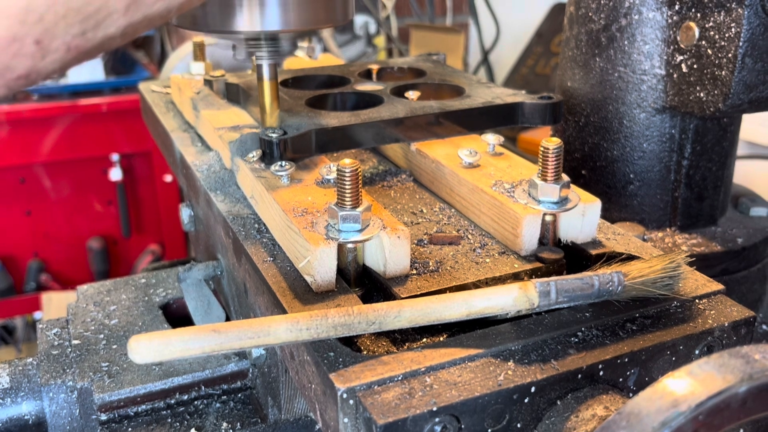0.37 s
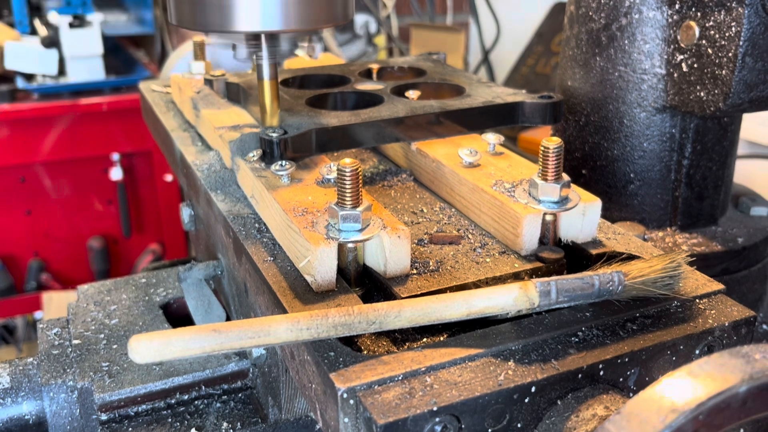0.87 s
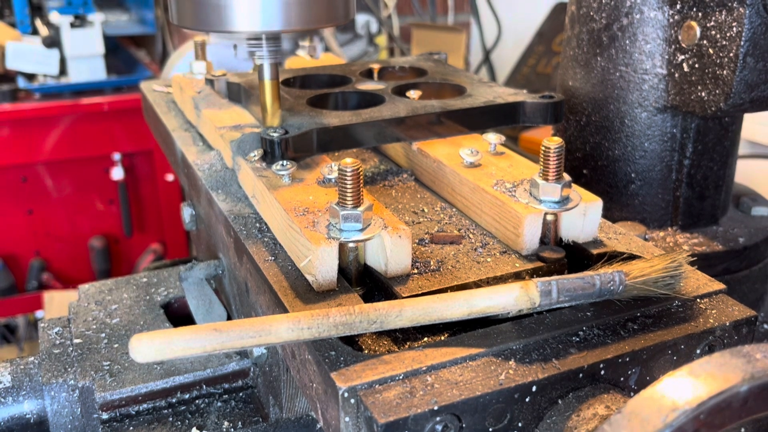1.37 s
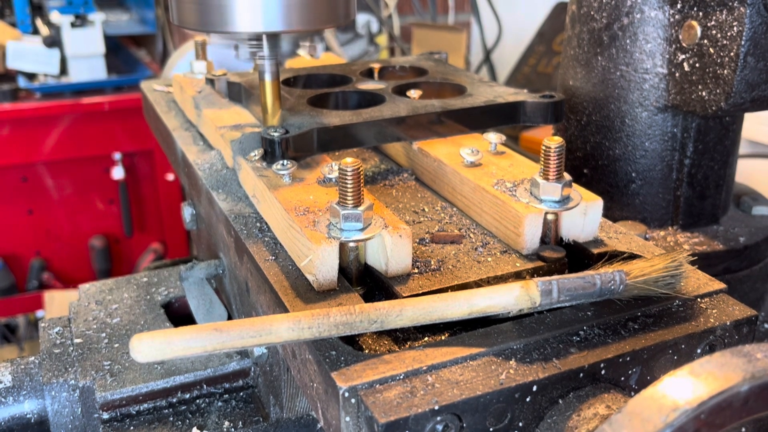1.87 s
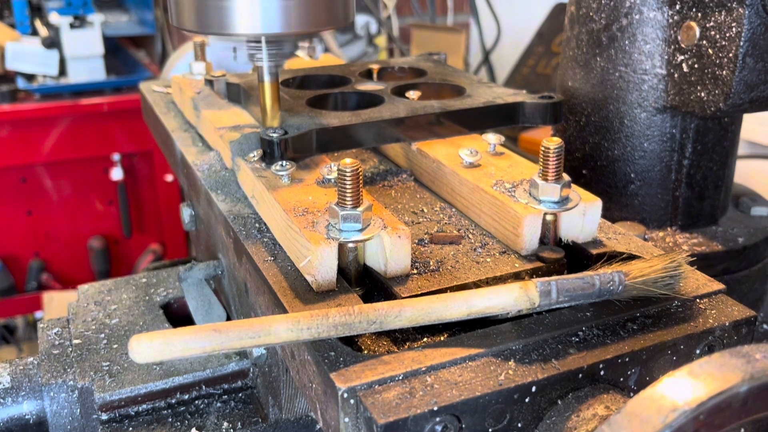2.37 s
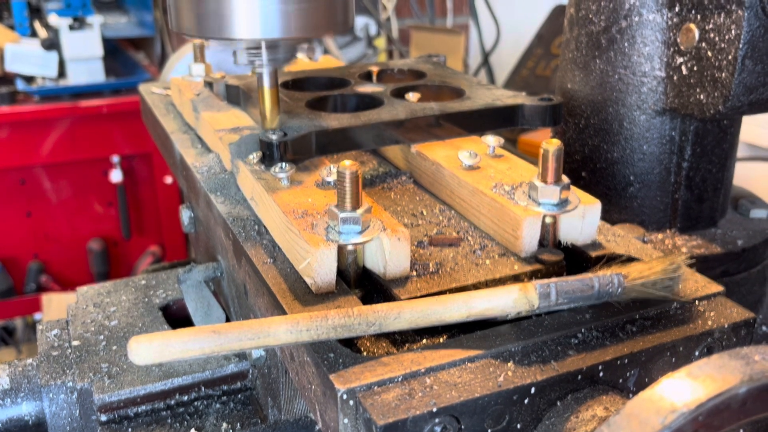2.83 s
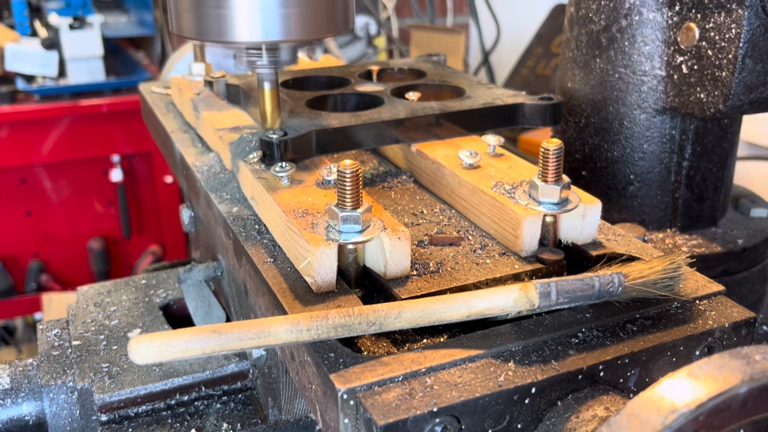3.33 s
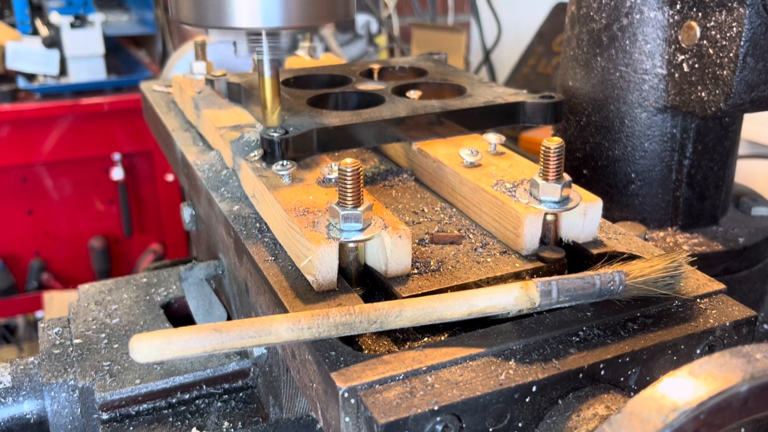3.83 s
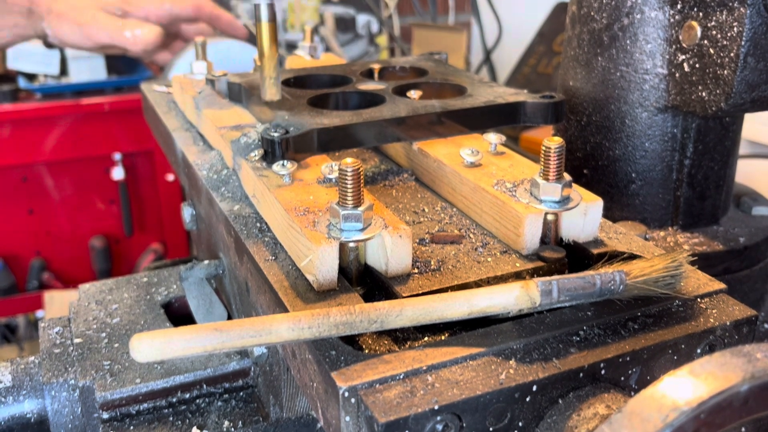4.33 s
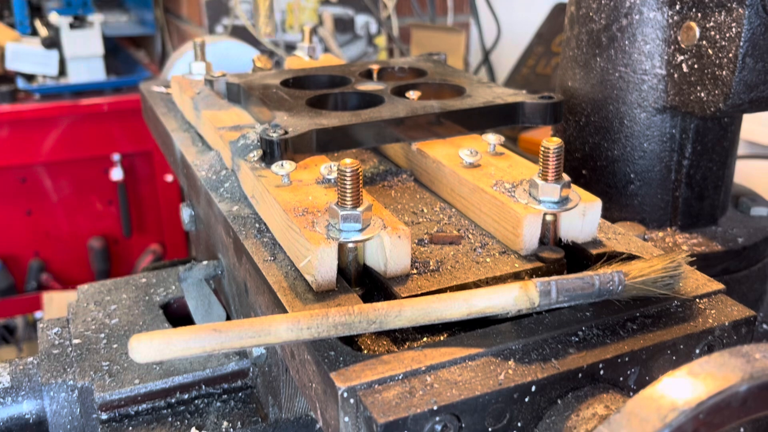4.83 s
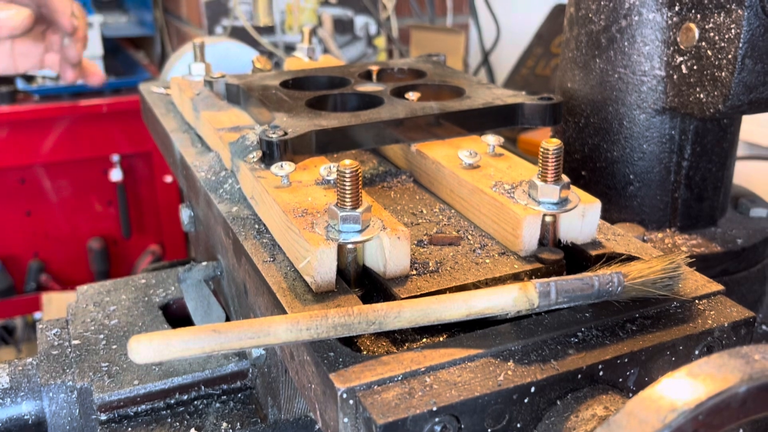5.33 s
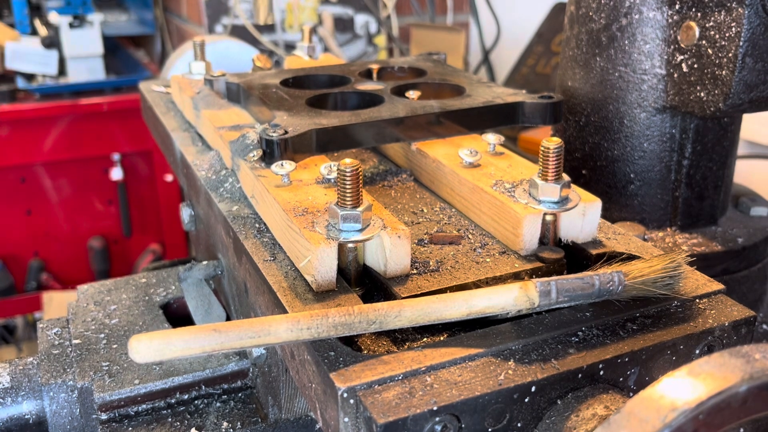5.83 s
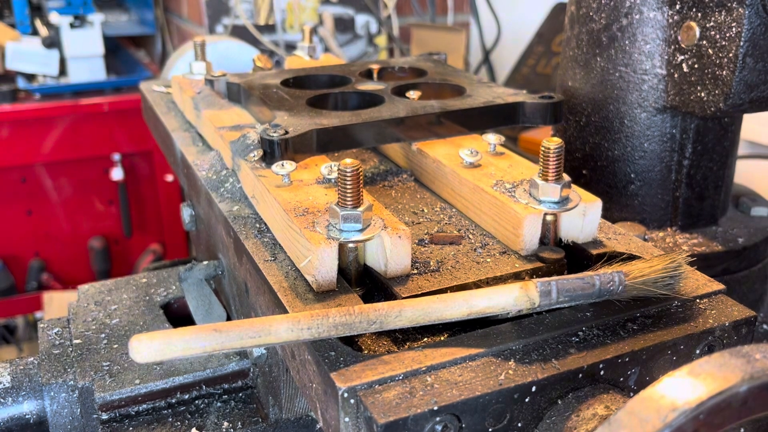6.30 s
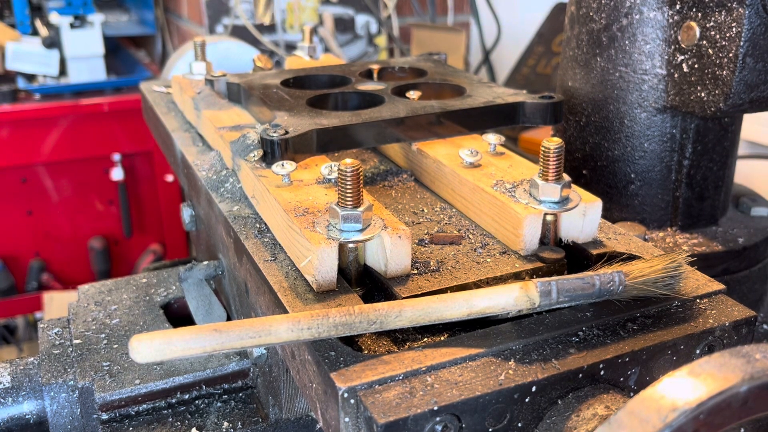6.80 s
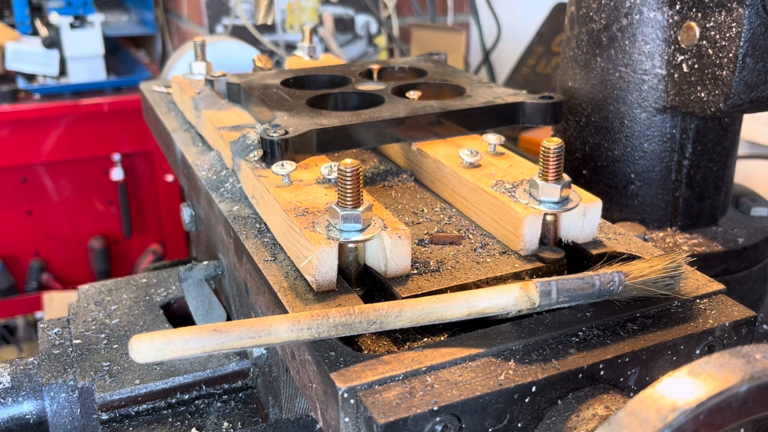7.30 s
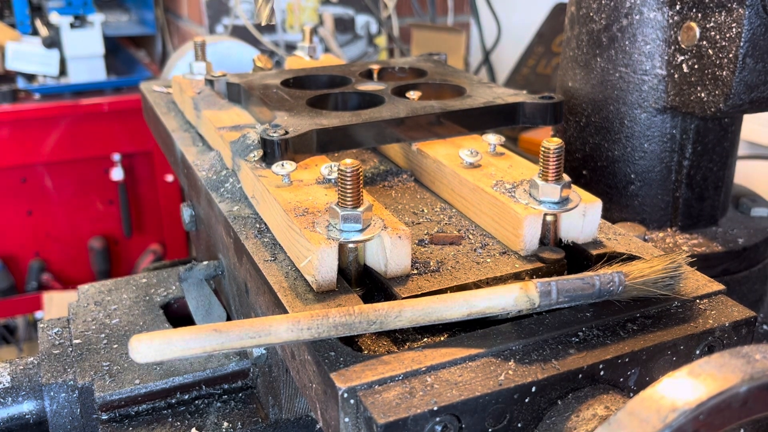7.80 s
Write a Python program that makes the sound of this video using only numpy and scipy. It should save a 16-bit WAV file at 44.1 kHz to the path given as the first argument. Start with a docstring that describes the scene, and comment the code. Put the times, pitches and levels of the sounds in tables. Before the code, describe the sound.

Steady drill press hum with rough cutting buzz and uneven belt thumps, a sharp switch click, a fading whir, then light knocks on a bench.

```python
"""First comes the hum of a belt-driven drill press in a small workshop, with belt thumps and a chattering end mill.
The motor hums at twice the mains frequency, the belt thumps the cast frame, and the end mill cuts plastic
and is lifted out. The switch clicks off, the spindle coasts to rest, and small things are knocked and put down.
Hum and whine are sums of sines; belt, cutting and rattles are noise coloured by resonances; soft bumps are
fading sines. Two microphone ports close by hear it, with echoes at the sides."""
import sys
import numpy as np
from scipy import signal
from scipy.fft import rfft, irfft, next_fast_len
from scipy.io import wavfile
from scipy.ndimage import map_coordinates

SR = 44100
rng = np.random.default_rng(int(sys.argv[2]) if len(sys.argv) > 2 else 0)


def wrap_up_sound(samples):
    """Save the sound to the file named by the first command line argument, as 16-bit audio."""
    columns = np.atleast_2d(samples).T
    # keep every value between -1 and 1, then stretch to whole-number steps
    tamed = np.clip(columns, -1, 1)
    steps = np.round(tamed * 32767).astype(np.int16)
    wavfile.write(sys.argv[1], SR, steps)


def attenuation_scalar(level_db):
    """Turn a level in dB into a linear amplitude multiplier (20 dB per decade)."""
    decades = np.asarray(level_db, float) / 20
    return 10 ** decades


N = 349272  # length in samples

HUM_HZ, SHAFT_HZ, BITE_HZ = 119.94, 29.72, 62.6  # motor hum, mean shaft turns, flute bites a second
LIFT_FROM_S, LIFT_TO_S = 3.23, 4.95  # the load comes off the motor
OFF_S, DROP_S, STOP_S = 5.31, 0.2, 6.77  # switch-off, length of the first drop, spindle stands still

# strong multiples of the hum [multiple, loaded level/dB, free level/dB, wavering/dB, grows from t/s, to t/s]
HUM_STRONG = [(1, -28, -24.5, 0, 3.9, 3.7), (3, -30, -26, 1, 3.7, 4.2), (4, -41.5, -33, -1, 4.34, 4.74),
              (5, -40, -31, 3.5, 3.7, 4.16)]
# weaker multiples of the hum [multiple, level/dB relative to the hum]
HUM_WEAK = [(2, -20.5), (6, -19.5), (8, -20), (9, -21.5)]
# tones tied to the motor shaft [multiple of shaft turns, loaded level/dB, free level/dB]
SHAFT_TONES = [(8.99, -47, -42), (9.98, -45, -49.5), (15, -46, -44.5), (17.89, -39, -48),
               (22.96, -41.5, -50), (25.83, -46, -54), (26.8, -41.5, -38.5), (35.1, -61, -62)]
# rows: rumble, frame, guard, bearing [running level/dB, change in the deepest bite/dB,
# change running free/dB, drop at switch-off/dB, fade while coasting/(dB/s)]
SHAKEN_LEVELS = [(-34, 11, -1, -2.5, -14), (-30, 5.5, -2.5, -9.5, -6), (-29.5, 1, -0.5, -14.5, -5),
                 (-48, 4, -0.5, -6.5, -7)]
# low rumble colour [f/Hz, level/dB per Hz]
RUMBLE_COLOUR = [(22, -120), (30, -5.5), (45, -21), (58, 1.5), (72, -1), (87, 0.5), (105, -2.5), (170, -13),
                 (230, -8), (400, -120)]
# low resonances of the casting [f/Hz, width/Hz, level/dB]
FRAME_MODES = [(183.2, 10.6, -5), (243, 26, -11), (276, 18.4, 0), (297, 16.6, 0.5), (374, 57, 0.5),
               (402.4, 14.7, 4.5), (428.5, 9, -7)]
# resonances of belt guard and table [f/Hz, width/Hz, level/dB]
GUARD_MODES = [(532.4, 26.8, 1), (579, 41, -6.5), (618, 20, -6), (683, 17, -14.5), (713, 25, -8),
               (765, 17.4, -6), (815, 22.5, -9), (893, 44, -11), (983, 57, -11.5), (1096, 46, -11.5),
               (1182, 15.4, -9.5), (1239, 11.4, -6.5), (1297, 17.5, -8.5), (1381, 30, -16.5),
               (1545, 66, -16), (1689, 15, -13.5), (1776, 17, -16.5), (1949, 26, -18), (2104, 92, -24)]
# resonances of the bearings [f/Hz, width/Hz, level/dB]
BEARING_MODES = [(2347, 80, 0.5), (2413, 23, 3.5), (2508, 46, -2), (3050, 81, -8), (3325, 44, -3.5),
                 (5110, 350, -17)]
# resonances heard while the spindle coasts [f/Hz, width/Hz, level/dB]
COASTING_MODES = [(380, 14, -14), (524, 14, 0), (1274, 68, 3.5), (1548, 31, 9.5), (1706, 53, 4),
                  (2380, 20, 0)]
# a bearing sings while the spindle coasts [f/Hz, level/dB, fade/(dB/s)]
BEARING_WHINES = [(2350, -59, -6), (2408, -59, -3.5)]
# table shake from the flute bites [t/s, level/dB]
TABLE_SHAKE = [(0, -46), (.2, -32), (.55, -30.5), (1.0, -29), (1.8, -31.5), (2.05, -38), (2.3, -30),
               (2.65, -32.5), (2.76, -24), (2.86, -25)]
# feed pressure, heard as tool chatter [t/s, level/dB]
CHATTER_LEVEL = [(0.0, -44.5), (0.5, -43.5), (0.93, -50.5), (1.27, -57), (1.54, -46), (1.69, -44),
                 (1.85, -43.5), (2.06, -41), (2.38, -44), (2.7, -39), (2.81, -36), (3.01, -51), (3.28, -45),
                 (4.1, -57.5), (4.3, -72), (5.3, -73)]
# resonances of end mill and chuck [f/Hz, width/Hz, level/dB]
TOOL_MODES = [(3270, 18, -7), (4620, 270, 7), (4880, 50, 2), (5610, 84, -4), (6080, 45, -0.5)]
# bright colour of chips, belt hiss and scrapes [f/Hz, level/dB per Hz]
CHIP_COLOUR = [(1800, -120), (3000, -8), (5500, -4), (7400, -5), (8500, -3), (10300, -3), (11800, 0),
               (13500, -3), (15400, -8), (16200, -60)]
# chips snapping off the tool [t/s, tick burst level/dB, tool ring burst level/dB]
CHIP_TICKS = [(1.9345, -34, -29), (2.813, -37, -18), (2.819, -28, -23), (2.827, -31, -29),
              (2.907, -45, -25.5), (2.9243, -21.5, -15.5), (3.0005, -35, -24.5), (3.043, -38, -30),
              (3.0506, -38, -27), (3.0798, -29.5, -23), (3.1464, -19, -16)]
# belt slaps [t/s, hiss burst level/dB, guard knock burst level/dB]
BELT_SLAPS = [(0.1491, -38, -19.5), (0.525, -32.5, -18.5), (0.7794, -44.5, -22.5), (0.9158, -45, -44),
              (1.289, -42, -26.5), (1.4915, -43, -23), (1.6911, -39, -22.5), (1.7719, -42, -36),
              (1.934, -39, -19.5), (2.1176, -39.5, -19.5), (2.2662, -40, -17), (2.5356, -37.5, -17),
              (2.74, -45, -34), (2.8095, -29, -18.5), (2.86, -33.5, -20), (3.066, -45, -20),
              (3.201, -32.5, -14), (3.245, -47, -21.5), (3.5498, -46, -24), (3.7733, -39, -19.5),
              (3.845, -52, -32), (3.9, -43, -26), (4.0163, -48, -23.5), (4.0512, -39, -15.5),
              (4.121, -40, -21.5), (4.1944, -43, -22.5), (4.2547, -43, -26), (4.425, -51, -28),
              (4.4697, -38.5, -19.5), (4.6019, -48, -19.5), (4.638, -47, -25), (4.6853, -42, -20.5),
              (4.9921, -49, -26), (5.0384, -50, -24), (5.1672, -40, -20.5), (5.3103, -48, -25.5)]
# resonances of the guard under a slap [f/Hz, width/Hz, level/dB]
SLAPPED_MODES = [(560, 65, -3.5), (748, 195, 1), (1295, 77, 4), (1053, 34, -9.5), (1662, 34, -2),
                 (2060, 100, -8), (2330, 1040, -18.5)]
# the switch snaps [t/s, level/dB]
SWITCH_SNAP = [(5.3397, -20.5)]
# ringing of the switch box [f/Hz, relative level/dB, t60/s]
SWITCH_BOX_MODES = [(1775, 7, .05), (1860, 3, .03), (1530, -6, .05), (2450, -3, .03), (2900, -1, .04),
                    (3200, 6, .035), (4780, -2, .028), (6080, 4, .025)]
# puffs that make up the snap: a flat 5 ms crack and a short tail
# [t after the snap/s, level/dB relative to the snap, t60/s]
SNAP_PUFFS = [(0, 9, .008), (.0014, 9, .008), (.0028, 8, .008), (.004, 8, .007), (.006, -6, .06)]
# colour of the snap [f/Hz, level/dB per Hz]
SNAP_COLOUR = [(600, -45), (1200, -9), (1700, 3), (2200, -3.5), (4000, -6.5), (6000, -7), (8000, -8),
               (12000, -15), (14500, -12), (16000, -30)]
# handled things [t/s, rattle level/dB, treble level/dB, low knock level/dB, t60 of rattle and treble/s]
HANDLED_KNOCKS = [(5.915, -38, -50, -63, 0.04), (6.34, -55, -52, -70, 0.022), (6.372, -29, -42, -65, 0.03),
                  (6.378, -44, -55, -65, 0.2), (6.791, -48, -31.5, -34.5, 0.15),
                  (6.797, -42, -21.5, -23.5, 0.058), (6.816, -44, -39, -32, 0.11),
                  (6.845, -45, -50, -33, 0.11), (6.889, -35, -61, -38, 0.11), (6.915, -37, -59, -43, 0.09),
                  (7.003, -46, -49, -49, 0.15), (7.076, -48, -62, -70, 0.044),
                  (7.118, -47, -41.5, -72, 0.11), (7.184, -44.5, -51, -53, 0.055)]
# colour of loose parts [f/Hz, level/dB per Hz]
RATTLE_COLOUR = [(500, -38), (800, 6), (1300, 1), (2200, 0), (3500, -7), (5500, -8), (8000, -26),
                 (10000, -62)]
# the small hard part lands [t/s, burst level/dB, t60/s]
PART_LANDINGS = [(6.791, -23.5, 0.14), (6.798, -24, 0.04), (6.808, -32, 0.03), (6.834, -39, 0.17),
                 (6.858, -37, 0.09)]
# resonances of the small hard part [f/Hz, width/Hz, level/dB]
PART_MODES = [(1575, 45, 7), (2750, 280, -10), (3380, 240, -6), (4200, 220, -8)]
# resonances of the wooden bench [f/Hz, width/Hz, level/dB]
BENCH_MODES = [(422, 25, -4), (544, 42, -4), (763, 45, -8), (270, 50, -10)]
# resonances of something sliding on the bench [f/Hz, width/Hz, level/dB]
RUBBED_MODES = [(285, 29, 4.5), (1110, 140, -10.5), (1263, 75, -7.5)]
# soft bumps on the bench [t/s, level before the quick rise/dB, f/Hz, t60/s]
BENCH_THUDS = [(6.912, -36, 840, 0.078), (6.913, -36, 953, .1), (6.93, -39, 820, 0.11),
               (7.198, -32.5, 102, 0.15), (7.2, -40.5, 394, 0.44), (7.36, -36, 262, 0.12),
               (7.5, -35, 300, .06), (7.533, -25, 210, 0.055), (7.551, -27.5, 169, 0.072)]
# colour of the room noise [f/Hz, level/dB per Hz]
AIR_COLOUR = [(25, -120), (40, -1), (57, 1.5), (100, -7.5), (300, -10.5), (1000, -20), (2200, -25.5),
              (4500, -36), (8000, -40.5), (12000, -45.5), (15500, -58), (16200, -90)]
# thin wavering room tones [f/Hz, wander/Hz, level/dB, fades in from t/s]
FAINT_TONES = [(57.5, 1.5, -49, 7.15), (1096, 4, -67, 6.9), (1096, 3, -61, 7.55), (2194, 8, -70, 6.4),
               (895, 8, -66, 6.9)]
# swells of the nearby treble rustle [t/s, peak level/dB, half length/s]
RUSTLE_SWELLS = [(5.777, -61.5, 0.41), (6.203, -64.5, 0.97), (7.01, -58, 0.17), (7.65, -55, 0.074),
                 (7.73, -66, .03), (7.92, -57, 0.037)]
# colour of the rustle [f/Hz, level/dB per Hz]
RUSTLE_COLOUR = [(1500, -63), (2500, 0), (5000, -1), (8000, -5.5), (12000, -6.5), (15000, -15),
                 (16200, -59)]
# how long the room's echoes last [f/Hz, t60/s]
WALL_DECAY = [(200, 0.24), (2000, 0.19), (5000, .18), (10000, 0.14)]
# side level set for the machine's echoes, nearly none from 2.3 to 6 kHz [f/Hz, level/dB]
MACHINE_SIDE = [(60, -26), (200, -23), (400, -13), (700, -4.5), (1300, -1.5), (1950, -7), (2300, -48),
                (2700, -43), (6000, -46), (8000, -19), (15000, -13.5)]
# side level set for the echoes of hits and room noise [f/Hz, level/dB]
AROUND_SIDE = [(60, -21), (400, -8.5), (1000, 3), (1900, -4), (2500, -15), (4000, -12.5), (5500, -9.5),
               (7800, -3), (9000, -44)]
# left port behind the right [f/Hz, phase/rad]
PORT_LAG = [(60, .16), (400, .08), (2300, 0), (6300, 0), (7100, .7), (7800, np.pi), (8850, np.pi),
            (11000, 2 * np.pi), (13600, 2 * np.pi), (14750, 3 * np.pi)]
# extra lag of the motor at the left port [f/Hz, phase/rad]
MOTOR_LAG = [(120, 0.074), (360, 0.19), (480, 1.25), (600, 0.46), (720, 1.43), (1080, 1.3)]
# left port minus right port [f/Hz, level/dB]
PORT_BALANCE = [(60, -.7), (120, -1.3), (200, -1), (360, -2.7), (540, 0), (690, -1), (1270, -2.7),
                (1750, 1), (2330, 0)]


def motor():
    """Magnetic pull pulses twice per mains cycle, louder off load; the column resonates on multiple 3 and rings on."""
    free = ramp(LIFT_FROM_S, LIFT_TO_S)
    steadying = 1 - 1.2 * free  # off load a fifth of the wavering is left, turned upside down
    gains, tones = [], []
    for multiple, load_db, free_db, waver_db, start, end in HUM_STRONG:
        rise_db = (free_db - load_db) * ramp(start, end)
        gains.append(attenuation_scalar(load_db + rise_db + waver_db * steadying * wobble(2.42)))
        tones.append(gains[-1] * tone(multiple * HUM_HZ))
    first, third, fourth, fifth = tones
    weak = gains[0] * sum(attenuation_scalar(db + 0.97 * wobble(3.8)) * tone(k * HUM_HZ) for k, db in HUM_WEAK)
    speed = SHAFT_HZ * (1 + .002 * wobble(3))
    shaft = 0
    for multiple, load_db, free_db in SHAFT_TONES:
        tone_db = load_db + (free_db - load_db) * free + 5 * wobble(9)
        shaft = shaft + attenuation_scalar(tone_db) * tone(multiple * speed)
    ring_db = -7 * ramp(OFF_S, OFF_S + DROP_S) - 26 * since(OFF_S + DROP_S)
    ring = attenuation_scalar(ring_db) * after(5.97, 0.43)
    return (first + weak + fourth + fifth + shaft) * after(OFF_S, 0.35) + ring * third


def drive():
    """Belt and bearings shake casting, guard and bench, most in the deepest bite, fading as the spindle coasts."""
    bite_s, build_s, release_s = 2.82, 0.23, 0.17  # the last, deepest bite
    plunge = ramp(bite_s - build_s, bite_s) - ramp(bite_s, bite_s + release_s)
    free, dropped = ramp(LIFT_FROM_S, LIFT_TO_S), ramp(OFF_S, OFF_S + DROP_S)
    states = [np.ones(N), plunge, free, dropped, since(OFF_S + DROP_S)]
    rumble_db, frame_db, guard_db, bearing_db = np.array(SHAKEN_LEVELS) @ states
    rumble = attenuation_scalar(rumble_db + 1.6 * wobble(4.29)) * noise(shape(RUMBLE_COLOUR), rough_db=-2.3, rate=13)
    frame = attenuation_scalar(frame_db + 0.64 * wobble(4.03)) * noise(body(FRAME_MODES), rough_db=0.95, rate=25)
    guard = attenuation_scalar(guard_db + 0.47 * wobble(3.92)) * noise(body(GUARD_MODES), rough_db=1.0, rate=30)
    bearing = attenuation_scalar(bearing_db + 1.7 * wobble(4.05)) * noise(body(BEARING_MODES), rough_db=1.5, rate=43)
    coast_gain = ramp(OFF_S, OFF_S + .06) * attenuation_scalar(-43.5 - 10.5 * since(OFF_S))
    coast = coast_gain * noise(body(COASTING_MODES), rough_db=0.0, rate=27)
    whine = 0
    for hz, db, fade_db in BEARING_WHINES:
        whine_db = db + fade_db * since(OFF_S) + 5.5 * wobble(25)
        whine = whine + attenuation_scalar(whine_db) * tone(hz + 15 * wobble(30))
    whine = whine * ramp(OFF_S, OFF_S + .08)
    return (rumble + frame + guard + bearing + coast) * after(STOP_S, 1) + whine * after(STOP_S, .1)


def cutter():
    """Each flute bite shakes the table and gates the chatter of the tool; chips hiss and tick."""
    shake_db, = curves(TABLE_SHAKE)
    chatter_db, = curves(CHATTER_LEVEL)
    cutting = after(TABLE_SHAKE[-1][0], 0.11)
    bite = tone(BITE_HZ)
    third = attenuation_scalar(-12.5 + 1.4 * wobble(5.37)) * tone(3 * BITE_HZ)
    shake = attenuation_scalar(shake_db) * cutting * (bite + third)

    gate = attenuation_scalar(0.7 * cutting * bite + 2.0 * wobble(70))
    chatter = attenuation_scalar(chatter_db) * unit(filtered(gate * rng.standard_normal(N), body(TOOL_MODES)))
    hiss_db = -49 + 0.64 * (chatter_db + 42.5)  # hiss follows the chatter, less strongly
    hiss = attenuation_scalar(hiss_db) * noise(shape(CHIP_COLOUR), rough_db=2.5, rate=47)

    s, tick_db, ring_db = np.transpose(CHIP_TICKS)
    t60 = np.full(len(s), 0.011)
    ticks = filtered(bursts(s, tick_db, t60, attack=0.00021), level(shape(CHIP_COLOUR)))
    knocking_modes = TOOL_MODES + [(2440, 240, 4.5), (3420, 670, -5.5)]  # the block knocks too
    ticks += filtered(bursts(s, ring_db, t60, attack=0.00057), level(body(knocking_modes)))
    return shake + (chatter + hiss) * after(OFF_S, 0.5) + ticks


def belt():
    """The belt slaps unevenly: a puff of hiss and a slower shudder of the guard."""
    s, hiss_db, knock_db = np.transpose(BELT_SLAPS)
    hiss = bursts(s, hiss_db, np.full(len(s), 0.17), attack=.003)
    knock = bursts(s, knock_db, np.full(len(s), 0.24), attack=.018)
    return filtered(hiss, level(shape(CHIP_COLOUR))) + filtered(knock, level(body(SLAPPED_MODES)))


def switch():
    """The toggle snaps over, a short flat crack of noise with a tail, and rings its box."""
    s, db = SWITCH_SNAP[0]
    t = since(s)
    ring = sum(attenuation_scalar(mode_db - 60 * t / t60) * np.sin(2 * np.pi * hz * t) for hz, mode_db, t60 in SWITCH_BOX_MODES)
    ring = attenuation_scalar(db - 4) * (1 - np.exp(-t / 0.00062)) * ring
    lag, puff_db, t60 = np.transpose(SNAP_PUFFS)
    crack = bursts(s + lag, db + puff_db, t60, attack=.0002)
    return ring + filtered(crack, level(shape(SNAP_COLOUR)))


def handling():
    """Small parts rattle and clink, knock the bench and slide."""
    s, rattle_db, treble_db, low_db, t60 = np.transpose(HANDLED_KNOCKS)
    rattle = filtered(bursts(s, rattle_db, t60, attack=0.0022), level(shape(RATTLE_COLOUR)))
    clink = filtered(bursts(*np.transpose(PART_LANDINGS), attack=0.0064), level(body(PART_MODES)))
    wood_t60 = 1.64 * t60  # the bench rings longer than the rattle
    knock = filtered(bursts(s, low_db, wood_t60, attack=0.0043), level(body(BENCH_MODES)))
    scrape = filtered(bursts(s, treble_db, t60, attack=0.00052), level(shape(CHIP_COLOUR)))
    rub = attenuation_scalar(-39.5) * swell(6.55, half=0.1) * noise(body(RUBBED_MODES), rough_db=2.0, rate=30)
    return rattle + clink + knock + scrape + rub


def thuds():
    """Each soft bump is a push on the bench: a sine that rises quickly and dies away."""
    s, db, hz, t60 = np.transpose(BENCH_THUDS)[..., None]
    t = np.maximum(np.arange(N) / SR - s, 0)
    rise = 1 - np.exp(-t / 0.0022)
    return np.sum(attenuation_scalar(db - 60 * t / t60) * np.sin(2 * np.pi * hz * t) * rise, axis=0)


def workshop():
    """Room noise drifts in level under faint wavering tones and a light treble rustle."""
    air = attenuation_scalar(-45 + 2.8 * wobble(1.88)) * noise(shape(AIR_COLOUR), rough_db=0.2, rate=14)
    tones = 0
    for hz, wander_hz, db, s in FAINT_TONES:
        gain = attenuation_scalar(db + 4 * wobble(14)) * (1 - after(s, 0.27))
        tones = tones + gain * tone(hz + wander_hz * wobble(12))
    rustle_gain = sum(attenuation_scalar(db) * swell(s, half) for s, db, half in RUSTLE_SWELLS)
    return air + tones + rustle_gain * noise(shape(RUSTLE_COLOUR), rough_db=-1.5, rate=30)


def walls(x):
    """Echoes are a noise tail in which each frequency dies at its own speed."""
    hz, t, z = signal.stft(rng.standard_normal(SR // 2), SR, nperseg=256)
    fading = z * attenuation_scalar(-60 * t / along(WALL_DECAY, hz)[:, None])
    tail = signal.istft(fading, SR, nperseg=256)[1]
    echoes = signal.fftconvolve(x, tail / np.linalg.norm(tail))[:N]

    def even(f):
        """Evens out the extra energy of slowly dying frequencies."""
        t60 = along(WALL_DECAY, f)
        return 1 / np.sqrt(t60 / np.mean(t60))
    return filtered(echoes, even)


def unit(x):
    """Scaled to rms 1."""
    return x / np.sqrt(np.mean(x ** 2) + 1e-20)


def along(points, hz):
    """Reads a curve of (f/Hz, value) points on a log frequency axis."""
    f, v = np.transpose(points)
    return np.interp(np.log(hz + 1), np.log(f + 1), v)


def curves(rows):
    """One value per sample for each column after the time."""
    s, *cols = np.transpose(rows)
    return [np.interp(np.arange(N) / SR, s, c) for c in cols]


def since(s):
    """Seconds passed after s, 0 before."""
    return np.maximum(np.arange(N) / SR - s, 0)


def after(s, t60):
    """Gain 1 until s, then a decay of 60 dB per t60."""
    return attenuation_scalar(-60 * since(s) / t60)


def ramp(start, end):
    """0 before start, 1 after end, straight between."""
    return np.interp(np.arange(N) / SR, [start, end], [0, 1])


def swell(s, half):
    """A bell-shaped gain that peaks at s."""
    return np.exp(-((np.arange(N) / SR - s) / half) ** 2)


def wobble(rate):
    """A smooth random curve, rate knots a second."""
    knots = rng.standard_normal(int(N * rate / SR) + 4)
    return map_coordinates(knots, [np.arange(N) * rate / SR])


def filtered(x, response):
    """x times a complex response of frequency."""
    m = next_fast_len(N + SR // 2)
    return irfft(rfft(x, m) * response(np.fft.rfftfreq(m, 1 / SR)), m)[..., :N]


def body(modes):
    """Causal response of a set of resonances, with alternating signs."""
    def response(f):
        total = 0
        for k, (centre, width, db) in enumerate(modes):
            damping = 1j * f * width
            total = total + (-1) ** k * attenuation_scalar(db) * damping / (centre ** 2 - f * f + damping)
        return total
    return response


def shape(points):
    """Response of a smooth spectrum."""
    return lambda hz: attenuation_scalar(along(points, hz))


def level(response):
    """The response scaled so that white noise keeps its rms."""
    return lambda f: response(f) / np.sqrt(np.mean(abs(response(f)) ** 2))


def tone(hz):
    """A sine of rms 1 that follows a pitch curve from a random phase."""
    turns = np.cumsum(hz * np.ones(N)) / SR + rng.random()
    return np.sqrt(2) * np.sin(2 * np.pi * turns)


def noise(response, rough_db, rate):
    """Coloured noise of rms 1 whose excitation is lumpy."""
    lumps = attenuation_scalar(rough_db * wobble(rate))
    return unit(filtered(lumps * rng.standard_normal(N), response))


def bursts(times, levels_db, t60s, attack):
    """Noise puffs that rise over the attack time, die away and end after a quarter second."""
    out, t = np.zeros(N + SR), np.arange(SR // 4) / SR
    for s, db, t60 in zip(times, levels_db, t60s):
        envelope = attenuation_scalar(db - 60 * t / max(t60, .005)) * (1 - np.exp(-t / attack))
        out[round(s * SR):][:len(t)] += envelope * rng.standard_normal(len(t))
    return out[:N]


def scene():
    """The ports differ by lag, balance and the echoes at the sides; the motor has an extra lag."""
    hits = switch() + handling() + thuds()
    machine = drive() + belt() + cutter()
    around = workshop() + hits + attenuation_scalar(-7.5) * walls(hits)
    # turns the echoes' phase so that the random tail does not favour one port
    turning = np.exp(2j * np.pi * np.cumsum(1.5 + .5 * wobble(2)) / SR)
    echoes = walls(filtered(machine, shape(MACHINE_SIDE)) + filtered(around, shape(AROUND_SIDE)))
    side = np.real(signal.hilbert(echoes, next_fast_len(N))[:N] * turning)
    sign = np.array([[1], [-1]])  # left, right: each takes half of the balance and the lags

    def port(hz):
        """Balance and lag of the two ports."""
        return attenuation_scalar(sign * along(PORT_BALANCE, hz) / 2) * np.exp(-.5j * sign * along(PORT_LAG, hz))
    hum = filtered(motor(), lambda hz: np.exp(-.5j * sign * along(MOTOR_LAG, hz)))
    return filtered(machine + around + hum, port) + sign * side


def roll_off(x):
    """The treble ends steeply here."""
    return signal.sosfilt(signal.butter(12, 15140, fs=SR, output="sos"), x)


def record(dry):
    """The band limit removes everything from 15950 Hz up."""
    mix = filtered(dry, lambda hz: hz < 15950)
    return roll_off(mix)


dry = scene()
out = record(dry)
wrap_up_sound(out)
```